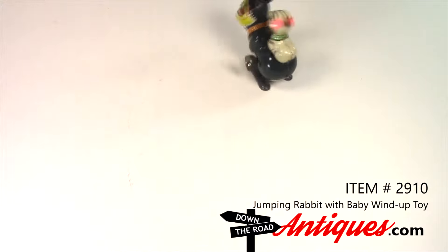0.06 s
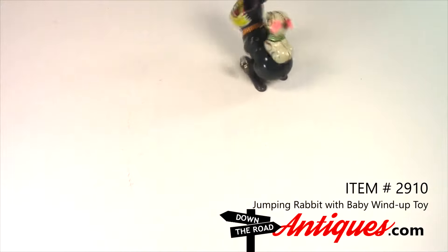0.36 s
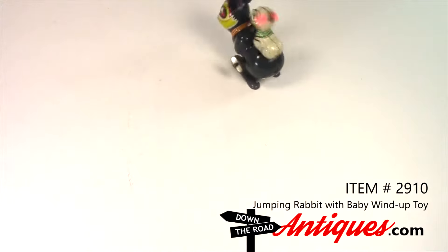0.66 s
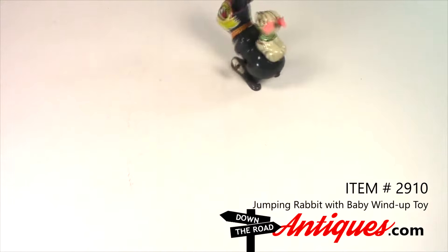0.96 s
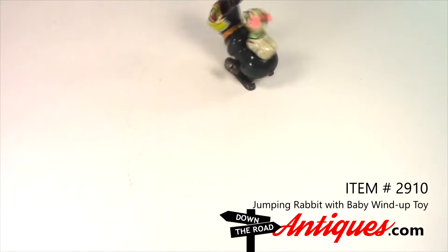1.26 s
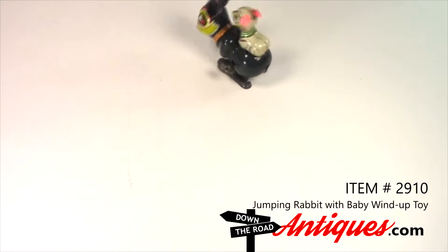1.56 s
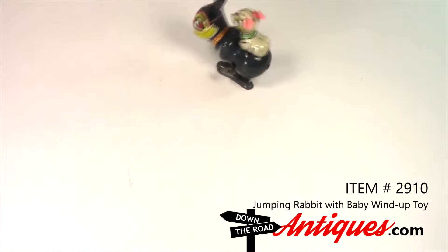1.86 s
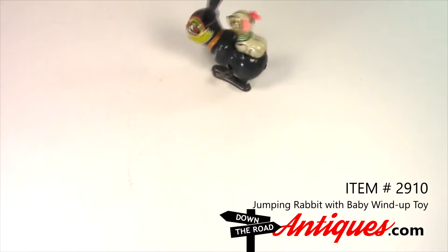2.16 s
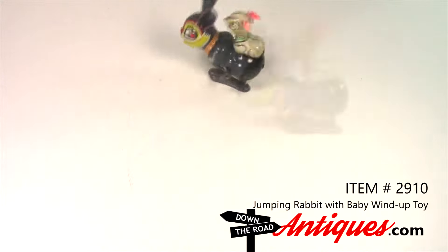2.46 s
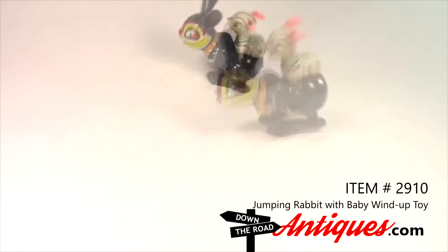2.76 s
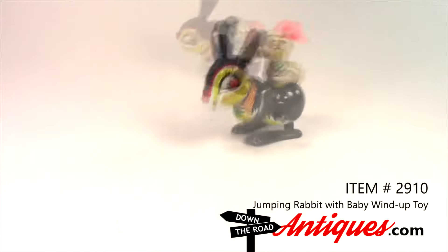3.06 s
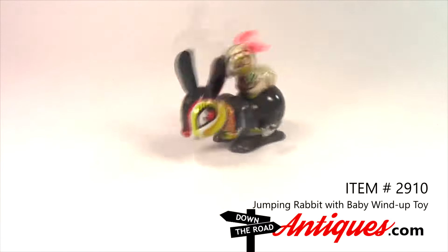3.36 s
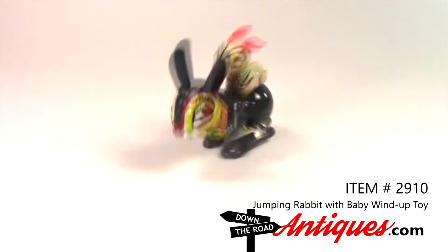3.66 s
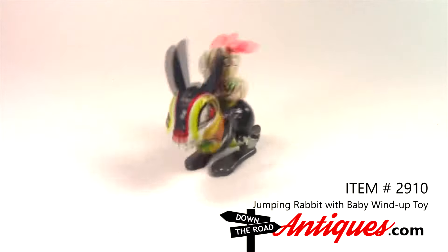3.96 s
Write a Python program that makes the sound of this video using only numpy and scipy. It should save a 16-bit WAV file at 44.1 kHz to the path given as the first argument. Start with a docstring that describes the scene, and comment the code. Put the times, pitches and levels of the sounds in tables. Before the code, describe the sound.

A wind-up tin rabbit hops across a hard table with bright, sharp clacks and faint clockwork ticks. A little past halfway the hops become closer, drier and faster as a rattle swells. The microphone is near, in a small room.

```python
"""Bright tin clacks: a wind-up rabbit hops on a hard table in a small room, close and nearly mono.
On each hop the spring lever snaps, clacks back, and the feet land and chatter; every blow rings the
tin shell and knocks on the table. The clockwork ticks faintly between hops, over a soft room tone.
From about 2.3 s the distant hops dissolve into closer, drier, faster ones, and the rattle swells."""
import sys
import numpy as np
from scipy import signal
from scipy.fft import rfft, irfft, next_fast_len
from scipy.io import wavfile
from scipy.ndimage import uniform_filter1d, minimum_filter1d

SR = 44100
rng = np.random.default_rng(int(sys.argv[2]) if len(sys.argv) > 2 else 0)


def put_to_file(sound):
    """Save the sound as 16-bit audio at rate SR, in the file named by the first command-line argument."""
    columns = np.atleast_2d(sound).T  # one column per channel
    safe = np.clip(columns, -1, 1)
    whole_steps = np.round(safe * 32767)
    wavfile.write(sys.argv[1], SR, whole_steps.astype(np.int16))


N = 176400
HIT_T = np.arange(4096) / SR  # time axis of one hit, s


def undb(db):
    """Decibels to gain."""
    return 10 ** (np.asarray(db) / 20)


def unit(x):
    """Scale to unit energy."""
    return x / np.sqrt(np.sum(x ** 2))


def fade(t, t60):
    """Exponential decay, 60 dB down at t60."""
    return np.exp(-np.log(1000) * t / t60)


def along(hz, points, values):
    """Read a curve on a log-frequency axis."""
    return np.interp(np.log(np.maximum(hz, 1)), np.log(points), values)


def eq(x, points, db):
    """Minimum-phase EQ through (Hz, dB) points."""
    n = 2 * next_fast_len(len(x))
    gain = undb(along(np.arange(n // 2 + 1) * SR / n, points, db))
    cepstrum = irfft(np.log(gain))
    cepstrum[1:n // 2] *= 2
    cepstrum[n // 2 + 1:] = 0
    return irfft(rfft(x, n) * np.exp(rfft(cepstrum)))[:len(x)]


def add(out, sound, at):
    """Mix a sound in at a time in seconds."""
    i = max(int(at * SR), 0)
    out[i:i + len(sound)] += sound[:max(len(out) - i, 0)]


def even(x, width_hz):
    """Level narrow peaks and dips: many overlapping modes, none standing out."""
    spectrum = rfft(x, 2 * len(x))
    power = np.abs(spectrum) ** 2 + 1e-18
    smooth = np.abs(uniform_filter1d(power, max(int(width_hz * 2 * len(x) / SR), 1)))
    return irfft(spectrum * np.sqrt(smooth / (power + .1 * smooth)))[:len(x)]


def burst(attack_s, hold_s, t60, t=HIT_T):
    """Dense shell modes as noise, held by chattering contact, then dying away."""
    envelope = np.minimum(t / attack_s, 1) * fade(np.maximum(t - hold_s, 0), t60)
    half = np.sqrt(envelope)
    return unit(even(rng.standard_normal(len(t)) * half, width_hz=400) * half)


def ring(hz, t60, rise_s):
    """One decaying mode."""
    tone = np.sin(2 * np.pi * (hz * HIT_T + rng.random()))
    return unit(tone * fade(HIT_T, t60) * (1 - np.exp(-HIT_T / rise_s)))


# Room tone spectrum: f/Hz, relative level/dB
AIR_EQ = [(25, -15), (60, -12), (95, -9), (125, 0), (200, -4), (500, -5), (1500, -9), (4000, -15),
          (10000, -30), (16000, -43)]


def air():
    """A faint, steady bed of dark room noise."""
    return unit(eq(rng.standard_normal(N), *np.transpose(AIR_EQ))) * np.sqrt(N) * undb(-60)


# Reverb bands: f/Hz, level/dB, t60/s
REVERB = [(70, -6, .45), (129, 1, .55), (200, 2, .42), (403, 2, .34), (975, .5, .29), (2730, -2, .28),
          (5850, -6, .25), (9870, -9.3, .2), (14900, -12, .16)]


def room_tail(size=24000, bands=12):
    """Diffuse echoes that favour no single pitch and last longest in the bass."""
    t, hz = np.arange(size) / SR, np.fft.rfftfreq(size, 1 / SR)
    points, db, t60 = np.transpose(REVERB)
    centres = np.geomspace(60, 16000, bands)
    early, onset = fade(t, .5), 1 - np.exp(-t / .004)
    noise = rfft(even(rng.standard_normal(size) * early, width_hz=150) / np.maximum(early, .05))
    tail = 0
    for centre, pick in zip(centres, np.eye(bands)):
        band = along(hz, centres, pick)
        decay = irfft(noise * band, size) * fade(t, along(centre, points, t60)) * onset
        tail = tail + unit(decay) * np.sqrt(band.mean()) * undb(along(centre, points, db))
    return tail


def echoes(x, count=14):
    """Crossfaded tails: the echo pattern shifts as the toy crosses the table."""
    place = np.linspace(0, count - 1, N)
    shares = (np.sqrt(np.maximum(1 - np.abs(place - k), 0)) for k in range(count))
    return sum(signal.fftconvolve(x * share, room_tail())[:N] for share in shares)


# Reverb send, easing off as distant hops fade into close ones: t/s, level/dB
REVERB_SEND = [(0, 0), (2.3, 0), (2.9, -1.8), (4, -1.8)]


def room(x, boom_hz=126.5):
    """Direct sound, echoes and one booming low mode, with a sliver of stereo width."""
    t = np.arange(SR) / SR
    boom = unit(np.sin(2 * np.pi * boom_hz * t) * fade(t, .45) * (1 - np.exp(-t / .0186)))
    send_db = np.interp(np.arange(N) / SR, *np.transpose(REVERB_SEND))
    boom_db = -14.5 + 2.5 * send_db  # the boom falls faster than the echoes
    mid = x + echoes(x * undb(send_db)) + signal.fftconvolve(x * undb(boom_db), boom)[:N]
    side = undb(-22.5) * signal.fftconvolve(x, room_tail())[:N] + undb(-21.5) * np.gradient(x)
    side = eq(side, [60, 300, 1200, 3500, 9000], [2, -6, -7, 4, 2])
    return np.array([mid + side, mid - side])


# Fader ride on the rattle: t/s, level/dB
RATTLE_RIDE = [(0, -66), (1.2, -65), (2.0, -65), (2.6, -51), (3.2, -50.5), (4, -49)]


def rattle(per_s=90):
    """Gears and loose parts patter irregularly inside the shell."""
    t = HIT_T[:len(HIT_T) // 6]
    out = np.zeros(N)
    for place, size in rng.random((int(per_s * N / SR), 2)):
        add(out, burst(.0005, .001, .018, t) * np.exp(2.8 * size), place * N / SR)
    patter = eq(out, [100, 350, 1600, 3200, 5000, 9500, 15000], [-13.5, 3, 1, -6.5, -9, -14, -28])
    ride_db = np.interp(np.arange(N) / SR, *np.transpose(RATTLE_RIDE))
    return unit(patter) * np.sqrt(N) * undb(ride_db)


# Clockwork tick cues: t/s, level/dB
TICK_CUES = [(1.077, -30), (1.1, -33), (2.205, -28), (2.26, -29)]


def ticks():
    """Single ticks of the clockwork between hops."""
    out = np.zeros(N)
    for at, db in TICK_CUES:
        tick = eq(burst(.001, .003, .02), [300, 3000, 5000, 9500, 14000], [-4, 3, -4, -5, -22])
        add(out, unit(tick) * undb(db), at)
    return out


# Foot ping cues: t/s, level/dB, f/Hz
PING_CUES = [(0.093, -22, 3900), (0.227, -28, 2900), (0.428, -25, 3650), (0.715, -13, 2900),
             (1.313, -18, 2900), (2.240, -22, 2900)]


def pings():
    """The tin feet ping as the toy rocks to rest."""
    out = np.zeros(N)
    for at, db, hz in PING_CUES:
        add(out, undb(db) * ring(hz, t60=.018, rise_s=.001), at)
    return out


# Body EQ of the dense shell modes: f/Hz, snap level/dB, return level/dB, landing level/dB
SHELL_EQ = [(50, -32, -32, -26), (120, -9, -11, -4), (200, -5, -7, -1), (310, 2.5, -2, 4.5),
            (480, -1, -3, 3), (750, 1, -2, 2.5), (1072, 1, -2, 4), (1630, 3.5, 3.5, 5.5), (2120, 1, -1, 1),
            (3334, 2, 1, 1), (4955, -2, -4.5, -5), (6430, 1, 2, 0), (7460, -4, -5, -4), (8300, -2, 1, -3),
            (9230, -.5, 1.5, -2), (10700, -2, 0, -5), (11470, -7, -8, -8), (12980, -14, -11, -16),
            (14900, -3, -7, -13), (16250, -14, -20, -24)]
# Strong tin modes: f/Hz, t60/s, snap level/dB, return level/dB, landing level/dB
TIN_MODES = [(1562.2, .02, -23, -20, -23), (2770, .025, -25, -18, -23), (2923.5, .025, -21, -22, -24),
             (3408, .05, -23, -27, -28), (6160, .08, -23, -16, -19), (6249.3, .15, -25, -20, -23),
             (6850, .035, -17, -22, -25), (9280, .03, -20, -19, -21), (9900, .04, -21, -17, -18),
             (10690, .028, -15, -13, -23), (14100, .05, -22, -18, -30), (14216, .07, -13, -23, -27),
             (14620, .05, -23, -16, -29), (14800, .05, -20, -23, -28)]
SNAP, RETURN, LANDING = range(3)  # picks the level column


def tin_hits(cues, kind, gain_db, attack_s, chatter_s, treble_t60, bass_t60, knock_db):
    """Each blow rings the shell and knocks on the table; the lows come later and stay longer."""
    modes, shell = np.array(TIN_MODES), np.array(SHELL_EQ)
    out = np.zeros(N)
    for at, db, bass, mid, top, knock_hz, *_ in cues:
        crack = eq(burst(attack_s, chatter_s, treble_t60), [300, 1200, 2500], [-20, -3, 0])
        body = eq(burst(.002, chatter_s, bass_t60), [600, 1200, 4000], [0, -3, -25])
        tin = unit(eq(crack + body, shell[:, 0], shell[:, 1 + kind]))
        for hz, t60, mode_db in modes[:, [0, 1, 2 + kind]]:
            detune, scatter_db = rng.standard_normal(2) * [.007, 2.5]
            tin += undb(mode_db + scatter_db) * ring(hz * (1 + detune), t60, attack_s)
        knock = undb(knock_db) * ring(knock_hz, t60=.03, rise_s=.002)
        hit = eq(tin + knock, [110, 180, 700, 1200, 2800, 4200, 8000, 10500],
                 [bass / 2, bass, bass, mid, mid, 0, 0, top])
        add(out, hit * undb(db + gain_db), at)
    return out


# Landing cues: t/s, relative level/dB, bass EQ/dB, mid EQ/dB, top EQ/dB, knock f/Hz
LANDING_CUES = [(0.053, -14.5, 1.5, -1.0, 3.0, 650.0), (0.087, -22, 1.0, -3, -2, 390.0),
                (0.36, -16.5, -3.5, -0.0, -2.5, 500.0), (0.65, -15.0, 2.5, 4.5, 0.0, 370.0),
                (0.7, -18, -6, -8.0, -1, 620.0), (0.715, -22, -5, 1, -12, 350.0),
                (0.839, -21.5, -0.5, 0.5, 6.0, 800.0), (0.957, -16.5, 1, -0.5, -0.0, 660.0),
                (0.986, -21.0, -5.5, -5.5, -2.0, 790.0), (1.247, -12.5, -5.0, 2.0, 3.0, 370.0),
                (1.285, -19.0, 2.0, -3.0, 1.5, 800.0), (1.313, -20.5, -3.5, -4.0, -17.5, 310.0),
                (1.356, -27.5, -3.0, -3.0, -3.0, 290.0), (1.531, -18.0, 6, 5.0, -4.0, 360.0),
                (1.549, -24, 0, 0, 2, 400), (1.584, -20.5, 1.0, -1.5, -8.5, 290.0),
                (1.829, -19.0, 0, -0.5, 3.5, 690.0), (1.857, -17.0, -7.0, -3.0, -6.5, 330.0),
                (2.135, -16.5, 0.0, 2.5, -0.0, 680.0), (2.182, -23, 0, 1, 0, 400),
                (2.239, -24.5, -1.5, 2.0, -2.0, 320.0), (2.319, -15, -2, -2, 1, 600),
                (2.3955, -14.0, -6.5, -1.5, 2.0, 580.0), (2.447, -17.5, 3.5, -1.5, 2.0, 720.0),
                (2.461, -20.0, 6.5, 7.5, -2.0, 290.0), (2.493, -20.0, -2.0, 3.0, 1.0, 620.0),
                (2.549, -22, 2, 3, -2, 500), (2.657, -21.0, 12.5, 9.5, 1.5, 370.0),
                (2.7565, -13.5, 7.0, 1.0, 8.0, 780.0), (2.784, -13.0, 2.5, -6.5, 1.5, 430.0),
                (2.8945, -13.0, 7.5, 3.0, -2.0, 400.0), (2.9, -19.5, 5.0, 11.0, 2.5, 390.0),
                (2.931, -21.0, -6.0, 1.5, -3.0, 450.0), (3.0052, -10.5, -2.0, 1.5, 3.5, 540.0),
                (3.065, -19, 0, 1, 1, 500), (3.0955, -10.5, 8, 1.5, 4.5, 650.0),
                (3.1032, -8.0, -7.0, 0.5, 0.0, 360.0), (3.211, -13.0, 5.5, -1.5, 0.5, 360.0),
                (3.303, -14.0, -9.0, 4.5, 1.5, 730.0), (3.322, -14.5, -2.5, -3.0, 4.5, 600.0),
                (3.3335, -10.0, 7.5, 1.0, -8.0, 600.0), (3.338, -4.5, -6.0, 0.0, -1.5, 390.0),
                (3.377, -19, 0, 0, 0, 450), (3.439, -11.5, 9, 3.0, -2.0, 450.0),
                (3.526, -12.5, -9.0, -6.0, -1.0, 550.0), (3.548, -11.0, -2.0, 3.5, 1.5, 380.0),
                (3.5835, -12.0, -7.5, -5.5, -7.0, 430.0), (3.636, -17, 1, 1, 0, 400),
                (3.645, -19, 0, 0, 2, 400), (3.672, -11.5, 7.5, 0.5, -2.0, 360.0),
                (3.7891, -9.5, -1, 2.5, -3.0, 390.0), (3.814, -16.5, 1.5, -5.5, -2.5, 370.0),
                (3.889, -8.5, -2.5, -7.5, -3.5, 320.0), (3.972, -13.0, -7.5, -3.5, -10.5, 710.0),
                (3.996, -12, -2, 0, 0, 500)]


def feet():
    """The feet land and bounce on the hard table."""
    return tin_hits(LANDING_CUES, LANDING, gain_db=5.6, attack_s=.0016, chatter_s=.004,
                    treble_t60=.02, bass_t60=.025, knock_db=-19)


def cam_scrapes(cues, lead_s=.006):
    """The lever scrapes off its cam just before each snap."""
    out = np.zeros(N)
    for at, db, *_ in cues:
        scrape = eq(burst(.001, lead_s, .02), [200, 1500, 5000, 10000, 14000], [-10, 3, -2, -6, -24])
        add(out, unit(scrape) * undb(db - 22), at - lead_s)
    return out


def panels(cues, gain_db, attack_s):
    """The panel struck hardest by each stroke sends a short ring straight at the listener."""
    out = np.zeros(N)
    for at, db, *_, panel_hz, panel_db in cues:
        add(out, undb(gain_db + db + panel_db) * ring(panel_hz, t60=.012, rise_s=attack_s), at)
    return out


# Lever cues, snapping out and clacking back: t/s, relative level/dB, bass EQ/dB, mid EQ/dB,
# top EQ/dB, knock f/Hz, panel f/Hz, panel level against the stroke/dB
SNAP_CUES = [(0.0182, -6, 0, -3, 3.5, 860, 9500, -10), (0.2405, -6.5, 1, 2, 2, 540, 2600, -11),
             (0.528, -7.5, 2, 0, 2.5, 650, 1450, -11), (0.8115, -7.5, 6.5, 4, 5.5, 780, 2950, -13),
             (1.1286, -5, 3, -1, .5, 670, 4450, -6), (1.403, -6, 2.5, 1, 0, 310, 2930, -7),
             (1.6844, -4, 2.5, -2, -.5, 790, 6850, -8), (2.0119, -5, 3, 0, .5, 670, 7000, -10),
             (2.323, -5.5, -2, 1, .5, 600, 5350, -12), (2.596, -8, -8, 0, -4, 810, 1680, -7),
             (2.7472, -6, -1, 0, 0, 640, 1350, -9), (2.9705, -6, 5.5, 1, -1.5, 760, 1750, -11),
             (3.187, -5, 4.5, 0, 2.5, 780, 1300, -8), (3.4153, -2.5, -1, -.5, -1.5, 440, 7000, -10),
             (3.6518, -7, 1, 2, 4.5, 890, 9300, -9), (3.8642, -2.5, 0, -1, 0, 330, 2200, -12)]
RETURN_CUES = [(0.332, -6, 3.5, -1.5, 0, 560, 10690, -12), (0.6054, -5.5, 6, 2, 2, 580, 10000, -12),
               (0.9259, -5.5, 2, .5, 1, 580, 10700, -9), (1.207, -5, 3.5, .5, .5, 580, 2850, -8),
               (1.4875, -6.5, 4.5, -.5, 3, 560, 2880, -12), (1.794, -5.5, 1.5, 0, 3, 550, 10700, -8),
               (2.0996, -7, 4.5, 0, .5, 390, 2850, -10), (2.4106, -9, 2, 2.5, 7.5, 550, 2900, -10),
               (2.523, -12, 11, 4.5, -.5, 550, 1300, -12), (2.6362, -4, 2.5, -1.5, -5, 540, 4450, -11),
               (2.837, -5.5, -8, -2, -2, 800, 9400, -9), (3.0396, -2.5, -10, -2.5, -8.5, 540, 6200, -9),
               (3.2714, -3, -7, -2, -4, 800, 3650, -11), (3.4924, -2.5, -10, -.5, -2.5, 680, 6100, -9),
               (3.7295, -3.5, -4.5, 1.5, .5, 810, 1600, -13), (3.94, -2.5, -4, -.5, -2.5, 900, 6200, -8)]


def lever(snap_db=3.8, return_db=3.6, attack_s=.0008):
    """The spring lever strikes the shell both ways; gives the clacks and their panel rings."""
    snaps = tin_hits(SNAP_CUES, SNAP, snap_db, attack_s, chatter_s=.003,
                     treble_t60=.022, bass_t60=.03, knock_db=-15)
    returns = tin_hits(RETURN_CUES, RETURN, return_db, attack_s, chatter_s=.003,
                       treble_t60=.02, bass_t60=.028, knock_db=-22)
    rings = panels(SNAP_CUES, snap_db, attack_s) + panels(RETURN_CUES, return_db, attack_s)
    return cam_scrapes(SNAP_CUES) + snaps + returns, rings


def scene():
    """The toy plays through the room, over the air; panel rings and pings stay dry."""
    clacks, panel_rings = lever()
    toy = clacks + feet() + ticks() + rattle()
    bed = air() + undb(-22) * air() * np.array([[1], [-1]])
    return bed + room(toy) + pings() + panel_rings


def record(dry, limit_db=-14, limit_s=.001, top_hz=16300):
    """A fast limiter holds the loudest clacks down; a steep low-pass trims the top."""
    needed = np.minimum(undb(limit_db) / (np.abs(dry).max(axis=0) + 1e-9), 1)
    span = int(limit_s * SR)
    gain = uniform_filter1d(minimum_filter1d(needed, span), span)
    return signal.sosfilt(signal.ellip(8, .2, 70, top_hz, fs=SR, output="sos"), dry * gain)


dry = scene()
out = record(dry)
put_to_file(out)
```